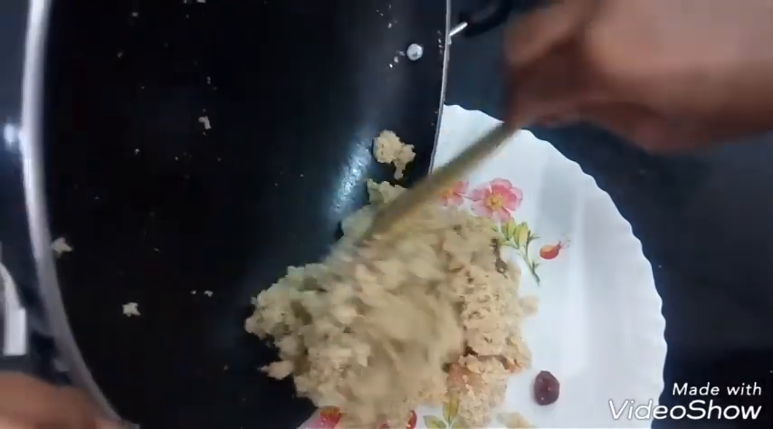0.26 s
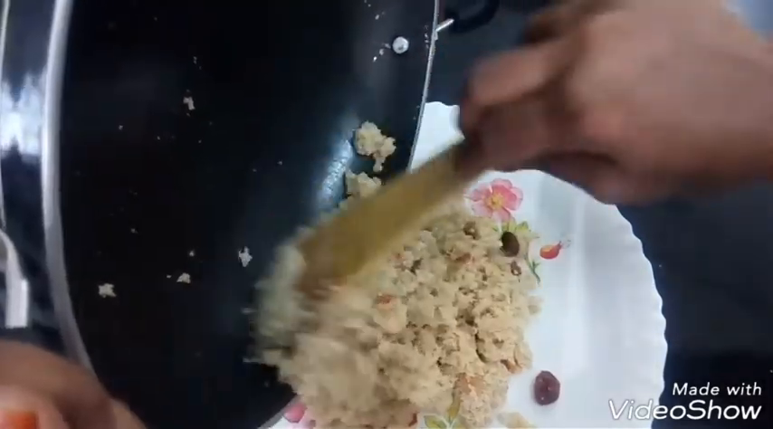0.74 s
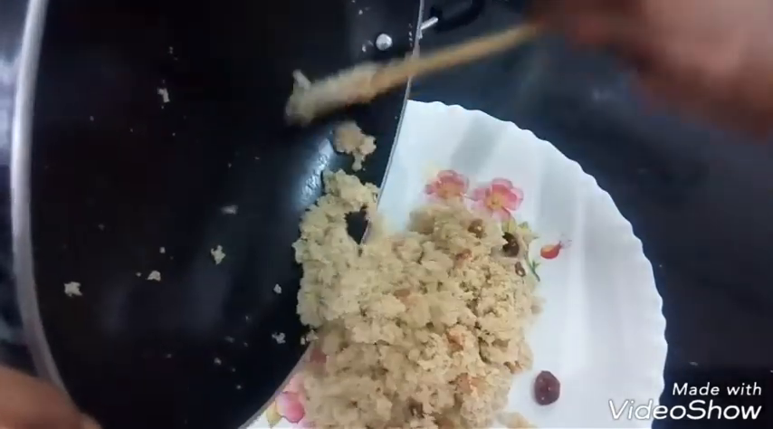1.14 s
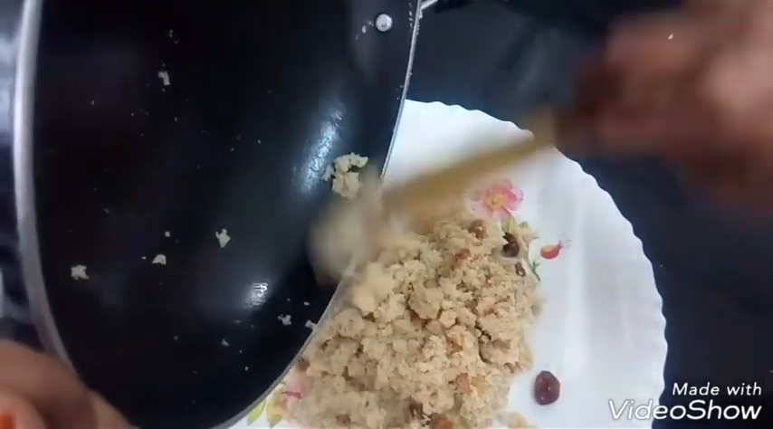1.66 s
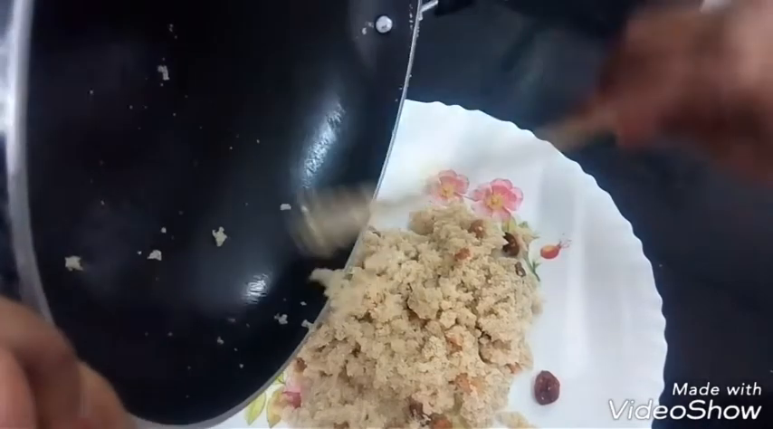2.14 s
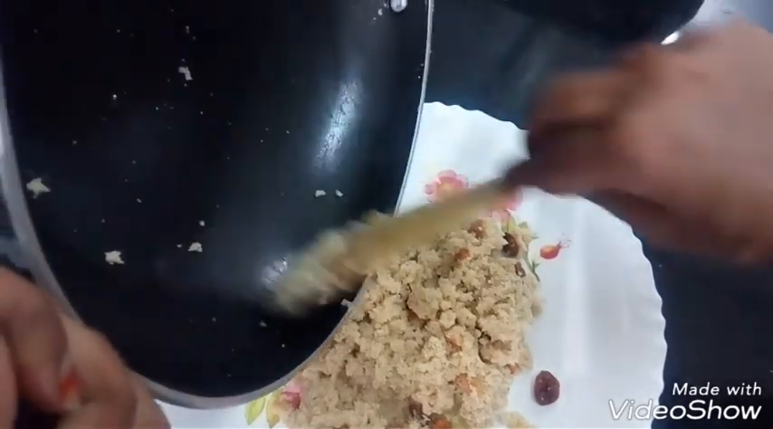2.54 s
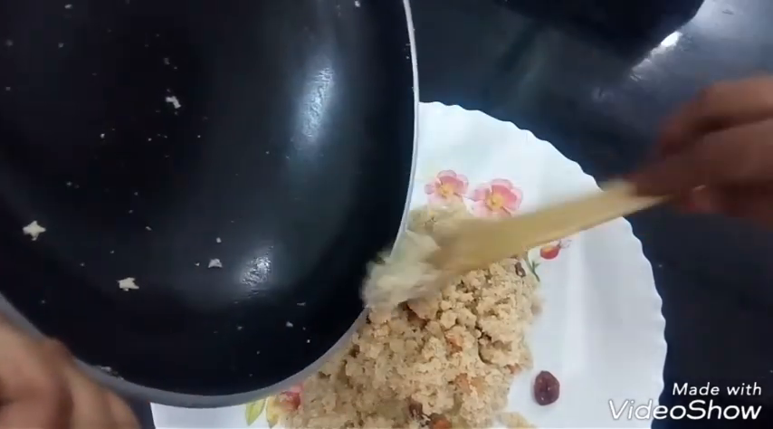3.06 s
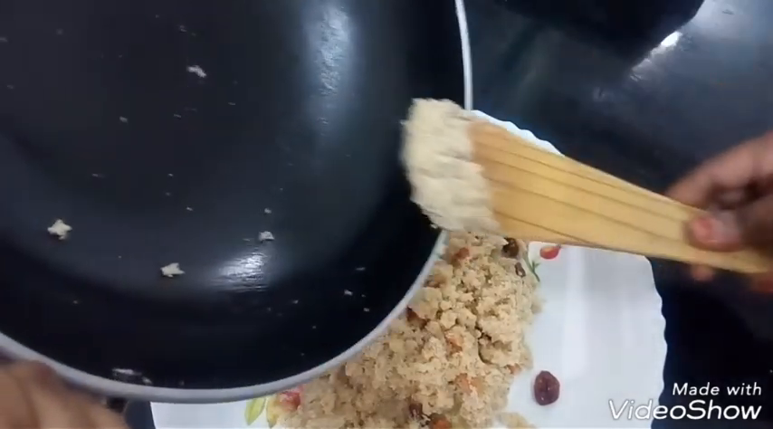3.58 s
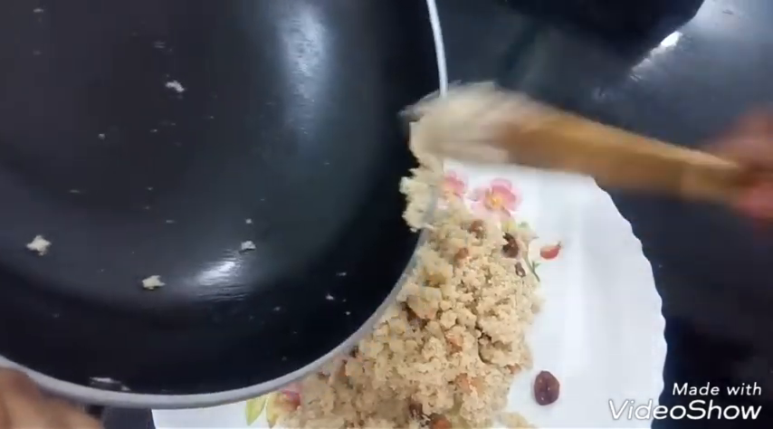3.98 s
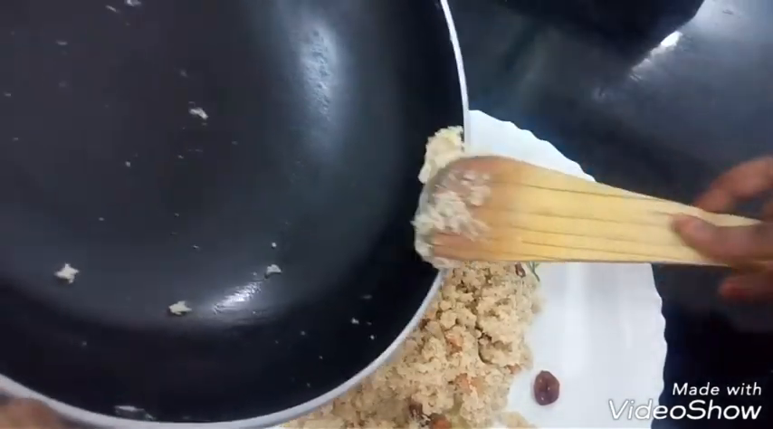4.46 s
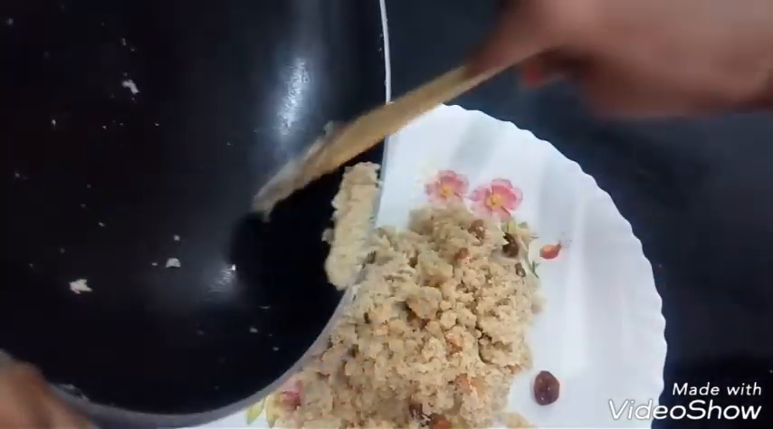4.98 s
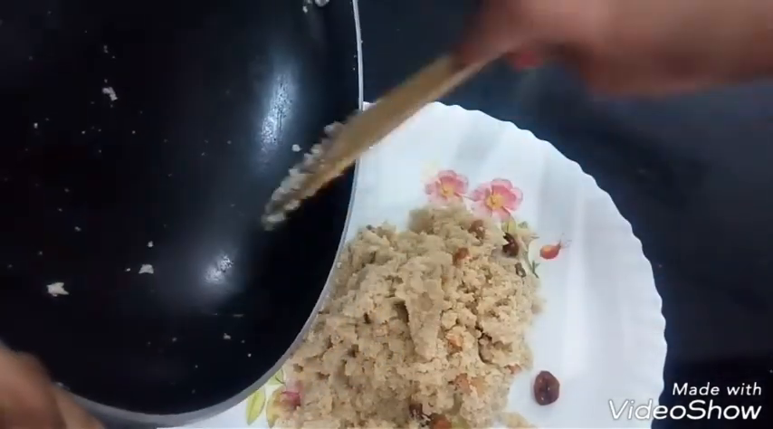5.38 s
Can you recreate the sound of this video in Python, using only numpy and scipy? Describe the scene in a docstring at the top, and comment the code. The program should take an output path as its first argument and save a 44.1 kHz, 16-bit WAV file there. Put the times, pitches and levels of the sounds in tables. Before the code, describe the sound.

Irregular scraping strokes of wood on a coated metal pan, starting with a squeaky bite and long rasp, then shorter sweeps with ticks and dull thuds. After three seconds there is a brief lull, a sharp knock on the pan rim, then quick wiping rubs and a final strong scrape. Heard close in stereo, in a lightly reflective kitchen with soft rumble and a faint motor-like hum.

```python
"""Small kitchen, close by: a wooden spatula pushes a moist, crumbly mixture out of a nonstick pan onto a plate.
Strokes are streams of random slips in four registers, rung through pan modes; some modes sing as bent sines.
Past halfway the spatula is knocked on the rim (contacts exciting damped modes) and wiped clean on it.
Clacks, taps and thuds are short damped tones. Behind: shaped-noise air and rumble, a thin whine, a gliding hum."""
import sys
import numpy as np
from scipy import signal
from scipy.fft import rfft, irfft
from scipy.io import wavfile
from scipy.ndimage import map_coordinates

SR = 44100
rng = np.random.default_rng(int(sys.argv[2]) if len(sys.argv) > 2 else 0)


def log_audio(samples):
    """Write samples as a 16-bit WAV file to the path given in sys.argv[1]."""
    # one column per channel
    frames = np.atleast_2d(samples).T
    # limit to full scale, then quantise
    limited = np.clip(frames, -1, 1)
    pcm = np.round(limited * 32767).astype(np.int16)
    wavfile.write(sys.argv[1], SR, pcm)


N = 247842
TIME = np.arange(N) / SR
FREQS = np.maximum(np.arange(N // 2 + 1) * SR / N, 1)


def scraping(smooth=0.8, crumbs=0.6, catch_db=1.5, drone_hz=650, hiss_hz=2400, fizz_hz=8000, alike_below_hz=600):
    """Tiny slips, breaking crumbs and smooth friction feed four registers that swell with each stroke."""
    # friction spectrum: [f/Hz, relative level/dB]
    friction_spectrum = [(110, -19), (210, -6), (330, 9), (480, 0.5), (750, -6), (1000, -5.5), (1400, -5.5),
                         (1800, 0), (2250, -7.5), (2800, -6.5), (4400, -8.5), (6800, -8.5), (8000, -18.5),
                         (11500, -22.5), (13500, -37.5), (15000, -51.5)]
    slips = grains(per_s=5500, spread_db=3.0) + crumbs * grains(per_s=300, spread_db=1.5)
    # spread along the blade: unlike at the two microphones
    rub = cut(rng.standard_normal((2, N)), alike_below_hz, "high")
    # blade catches and lets go
    catch = rms_one(cut(rng.standard_normal(N), 90.0, "low"))
    slips = (slips + smooth * rub) * from_db(catch_db * catch)

    above_drone = 1 / (1 + (drone_hz / FREQS) ** 6)
    above_rasp = 1 / (1 + (hiss_hz / FREQS) ** 6)
    above_fizz = 1 / (1 + (fizz_hz / FREQS) ** 24)
    registers = [1 - above_drone, above_drone - above_rasp, above_rasp * (1 - above_fizz), above_fizz]
    colour = gains(friction_spectrum)
    out = 0
    for level, register in zip(efforts(), registers):
        out = out + level * rms_one(shaped(slips, register * colour))
    return out


def efforts(attack_s=.004, ease_db_per_s=6, fizz_db=-64, firm_sweep_db=-48, fizz_growth=1.4,
            fizz_waver_db=2.6, fizz_waver_hz=22):
    """Drone, rasp, hiss and fizz amplitudes: bites grind on bare pan, sweeps move the mixture along."""
    # bites: [start t/s, length/s, drone level/dB, rasp re drone/dB, hiss re drone/dB]
    bite_table = [(0.056, 0.012, -67, 5, 4), (0.078, 0.12, -47, -4.5, -4), (0.835, 0.014, -51, -9, 1.5),
                  (1.33, 0.15, -57, 2.5, 2), (2.065, 0.034, -51.5, -3, -4), (2.53, 0.11, -47, -5, -7.5),
                  (3.53, 0.085, -50, 0, -3.5), (5.16, 0.024, -53, -2.5, -2)]
    # sweeps: [start t/s, rise/s, length/s, fade after rise/dB, hiss level/dB, rasp re hiss/dB, drone re hiss/dB]
    sweep_table = [(0.231, 0.14, 0.4, 19.5, -48.5, -7.5, -7), (0.871, 0.06, 0.16, 3, -49, -15, -21.5),
                   (1.056, 0.031, 0.24, 13, -75, 8, -5), (1.295, 0.02, 0.03, 2, -66, -1, -18),
                   (1.435, 0.13, 0.17, 5.5, -48.5, -4.5, -10), (1.615, 0.046, 0.13, 0.5, -54.5, -7, -4.5),
                   (2.095, 0.049, 0.029, 13, -43.5, -6.5, -38), (2.112, 0.1, 0.12, -1.5, -48.5, -11, -13),
                   (2.603, 0.072, 0.26, 12.5, -48.5, -4.5, -3.5), (3.08, 0.067, 0.16, 4.5, -48.5, -8, -25),
                   (3.611, 0.14, 0.14, 2.5, -48, -10, -5), (3.751, 0.018, 0.13, -13, -64, -11.5, -6.5),
                   (3.901, 0.024, 0.037, 9.5, -49.5, -20, -14),
                   (3.933, 0.05, 0.054, 4.5, -44.5, -10.5, -4.5), (4.077, 0.058, 0.074, 1, -68.5, -13, -5),
                   (4.176, 0.024, 0.086, 0.5, -67.5, -20, 4), (4.315, 0.12, 0.155, 9, -45.5, -7, -4.5),
                   (4.446, 0.015, 0.45, 21.5, -55.5, -14.5, 2), (4.692, 0.043, 0.084, 6, -59.5, -22, -16),
                   (4.728, 0.052, .056, 0, -48.5, -12, -11), (5.201, 0.055, 0.034, 10, -38.5, -6.5, -12.5),
                   (5.247, 0.028, 0.11, 0.5, -49, -9.5, -8)]
    drone, rasp, hiss = np.zeros((3, N))
    for s, length_s, db, rasp_db, hiss_db in bite_table:
        bite = from_db(db) * stroke(s, attack_s, length_s, 0)
        drone += bite
        rasp += from_db(rasp_db) * bite
        hiss += from_db(hiss_db) * bite
    for s, rise_s, length_s, fade_db, db, rasp_db, drone_db in sweep_table:
        sweep = from_db(db) * stroke(s, rise_s, length_s, fade_db)
        # wrist eases: drone dies before hiss
        eased_db = ease_db_per_s * np.clip(TIME - s - rise_s, 0, length_s)
        drone += from_db(drone_db - eased_db) * sweep
        rasp += from_db(rasp_db) * sweep
        hiss += sweep
    # fizz outgrows hiss; its level wavers at random
    speed = hiss / from_db(firm_sweep_db)
    fizz = from_db(fizz_db + fizz_waver_db * drift(fizz_waver_hz)) * speed ** fizz_growth
    return drone, rasp, hiss, fizz


def stroke(s, rise_s, length_s, fade_db, release_db_per_s=288):
    """Stroke envelope: the blade gathers speed, changes level along its path, then lifts."""
    t = np.maximum(TIME - s, 0)
    attack = np.sin(np.pi / 2 * np.minimum(t / rise_s, 1))
    along = np.clip((t - rise_s) / max(length_s - rise_s, .005), 0, 1)
    lifted_s = np.clip(t - length_s, 0, 1)
    return attack * from_db(-fade_db * along - release_db_per_s * lifted_s)


def wall_echo(x, share, path_s, travel, rate_hz):
    """A pan wall answers after a randomly wandering delay, so comb colouring keeps shifting."""
    r = np.exp(-2 * np.pi * rate_hz / SR)
    # first half dropped: filter settling
    place = rms_one(signal.lfilter([1], [1, -2 * r, r * r], rng.standard_normal(2 * N))[N:])
    delay_s = path_s * np.exp(travel * place)
    echo = np.array([np.interp(TIME - delay_s, TIME, side) for side in x])
    return (x + share * echo) / np.sqrt(1 + share ** 2)


def pan(x, ring_db, shift_db=0, nodes_hz=12):
    """Direct contact plus pan modes; a moving blade crosses their still lines, feeding each by turns."""
    # pan modes: [f/Hz, width/Hz, relative lift/dB]
    pan_modes = [(414, 18, -2), (581, 8, -6), (628, 20, -2), (893, 35, -6), (1262, 30, -7), (1809, 12, 0),
                 (1981, 4.5, 9), (2293, 10, -2), (2735, 25, -2), (2850, 20, -2), (3345, 10, -3),
                 (4240, 40, -3), (4449, 14, 2), (4716, 25, 1), (5170, 45, 0), (5486, 13, 6), (5669, 16, 0),
                 (6235, 8, 6), (6550, 14, 1), (6830, 22, 2), (7740, 35, 1)]
    out = x
    for hz, width_hz, db in pan_modes:
        feed_db = ring_db + db + shift_db * np.tanh(drift(nodes_hz))
        out = out + resonance(x * from_db(feed_db), hz, width_hz)
    return out


def hollow(width_hz=120):
    """The gap under the blade rings like a cavity; its pitch falls as the gap opens."""
    # light stroke: [start t/s, length/s, start f/Hz, end f/Hz, level/dB]
    gap_stroke = (3.11, .15, 900, 430, -61)
    s, length_s, from_hz, to_hz, db = gap_stroke
    hz = from_hz * (to_hz / from_hz) ** np.clip((TIME - s) / length_s, 0, 1)
    noise = rms_one(cut(rng.standard_normal(N), width_hz, "low"))
    carrier = np.sin(2 * np.pi * np.cumsum(hz) / SR)
    return from_db(db) * stroke(s, length_s / 2, length_s, 0) * noise * carrier


def squeaks(flutter=0.3, waver=.002, rate_hz=130, ring_on_db=-9):
    """Stick-slip locks on to a mode: a tone of unsteady strength and pitch that rings on steadily."""
    # squeaks: [peak t/s, swell half-length/s, f/Hz, level/dB, ring t60/s]
    squeak_table = [(0.03, 0.055, 1812, -62, .3), (0.01, .04, 2842, -66, .2), (0.064, .009, 2842, -55, .2),
                    (0.1, 0.026, 2842, -46, .2), (0.118, 0.036, 4452, -38, .18),
                    (0.158, .016, 4480, -45, .15), (0.15, .04, 1810, -52, .2),
                    (0.208, 0.026, 1810, -44, .2), (1.313, .012, 4450, -56, .2),
                    (1.345, .008, 4300, -44, .1), (1.77, .06, 1982, -64, .6), (2.11, 0.02, 4450, -46, .2),
                    (2.255, 0.055, 1982, -55, .65), (2.608, 0.06, 354.5, -45, .3),
                    (2.64, .035, 5486, -49, .3), (2.661, 0.02, 1830, -39, .2), (2.85, 0.08, 1982, -64, .55),
                    (3.16, 0.03, 6570, -48, .2), (3.235, .022, 6570, -46, .2), (3.265, 0.07, 1981, -58, .6),
                    (4.2, .016, 5600, -55, .2), (4.205, .016, 7100, -62, .15), (4.42, .04, 1982, -54, .4),
                    (5.173, 0.012, 1810, -47, .2), (5.47, .05, 2780, -72, .2), (5.56, .08, 3340, -69, .4)]
    out = np.zeros(N)
    bend, rough = rms_one(cut(rng.standard_normal((2, N)), rate_hz, "low"))
    for s, length_s, hz, db, t60_s in squeak_table:
        driven = swell(s, length_s)
        tail = (TIME > s) * from_db(ring_on_db - 60 * np.clip((TIME - s) / t60_s, 0, 2))
        strength = np.maximum(driven * (1 + flutter * rough), tail)
        clock_s = np.cumsum(1 + waver * bend * driven) / SR
        out += from_db(db) * strength * np.sin(2 * np.pi * hz * clock_s)
    return out


def knock(level_db=-1.5, crack_db=-23.5, crack_t60_s=0.15, low_hz=105, top_hz=7300):
    """Flat wood meets the rim in a quick run of contacts; each excites a crack and damped modes."""
    # contacts: [t/s, relative level/dB, contact softness (lowpass) f/Hz]
    contacts = [(3.5237, -3, 2500), (3.5282, -27, 5400), (3.5262, -1.5, 11000), (3.5319, -17.5, 1900),
                (3.5456, -11, 3300)]
    # struck blade and rim: [f/Hz, relative level/dB, t60/s]
    rim_modes = [(324, -40, 0.08), (407, -29, 0.036), (640, -33, .1), (633, -18.5, 0.0028),
                 (1340, -31.5, 0.019), (1970, -10.5, 0.011), (1981, -28, 0.12), (2220, -13, 0.011),
                 (2310, -34.5, .11), (2730, -47.5, .18), (3300, -22, 0.013), (4610, -15.5, 0.01),
                 (5510, -28.5, 0.025), (6370, -26, 0.0023), (6830, -34, .08)]
    force = np.zeros(N)
    for s, db, soft_hz in contacts:
        add(force, s, from_db(db) * cut(signal.unit_impulse(256), soft_hz, "low", order=1))
    t, fade = dying(crack_t60_s, .2)
    body = from_db(crack_db) * fade * cut(rng.standard_normal(len(t)), [250, 6500], "band")
    for hz, db, t60_s in rim_modes:
        body += from_db(db) * dying(t60_s, .2)[1] * np.cos(2 * np.pi * hz * t)
    blow = cut(signal.fftconvolve(force, body)[:N], low_hz, "high")
    return from_db(level_db) * cut(blow, top_hz, "low", order=8)


def clacks(crack_db=-5, crack_t60_s=.015, top_hz=4800):
    """Bare, hard contact of wood on pan: a dense crack plus a few short wood modes."""
    # clacks: [t/s, level/dB, pitch f/Hz]
    clack_table = [(1.2445, -37.5, 1304), (1.415, -39.5, 1610), (1.435, -21.5, 2020)]
    # modes: [multiple of pitch, relative level/dB, t60/s]
    wood_modes = [(.72, -7, .012), (1, -2, .011), (1.3, -4, .011), (1.9, -11, .008)]
    out = np.zeros(N)
    for s, level_db, hz in clack_table:
        t, fade = dying(crack_t60_s, .05)
        burst = rms_one(cut(rng.standard_normal(len(t)), [hz / 2, hz * 2], "band"))
        clack = from_db(crack_db) * fade * burst
        for multiple, db, t60_s in wood_modes:
            clack += from_db(db) * dying(t60_s, .05)[1] * np.cos(2 * np.pi * hz * multiple * t)
        add(out, s, from_db(level_db) * cut(clack, hz * .64, "high", order=4))
    return cut(out, top_hz, "low", order=4)


def taps(note=0.43, grit=0.6, top_hz=7000):
    """Light blade ticks on pan and plate: a heavily damped note with a burst of grit around it."""
    # taps: [t/s, level/dB, pitch f/Hz, t60/s]
    tap_table = [(0.0812, -38, 2850, 0.009), (0.0895, -33, 4330, 0.0061), (.8435, -34, 4250, 0.013),
                 (1.3315, -32, 2600, .02), (1.3409, -37, 4200, 0.045), (1.399, -24, 3350, 0.008),
                 (3.747, -36, 5600, 0.0065), (3.8638, -27.5, 4600, 0.017), (3.9135, -37, 5500, .008),
                 (4.327, -41, 4100, .012), (4.452, -32, 4500, 0.0081), (5.356, -32, 5700, 0.0069),
                 (4.3575, -29.5, 5000, 0.016), (4.3829, -27.5, 4400, 0.014)]
    out = np.zeros(N)
    for s, db, hz, t60_s in tap_table:
        t, fade = dying(t60_s, 0.015)
        band_hz = [hz * .5, hz * 2]
        burst = rms_one(cut(rng.standard_normal(len(t)), band_hz, "band", order=1))
        tap = fade * (note * np.sin(2 * np.pi * hz * t) + grit * burst)
        add(out, s, from_db(db) * cut(tap, band_hz, "band"))
    return cut(out, top_hz, "low", order=4)


def thuds(t60_s=0.089, rise_s=0.003):
    """Blade landing through the mixture, or a dropped lump: a cushioned blow moves low, damped modes."""
    # thuds: [t/s, level/dB, pitch f/Hz]
    thud_table = [(0.844, -42.5, 345), (1.496, -41.5, 329), (2.533, -68, 353), (3.253, -55, 430),
                  (3.69, -37, 458), (4.762, -42, 418), (5.165, -40, 359.5), (5.355, -39.5, 364)]
    # modes: [multiple of pitch, relative level/dB]
    thud_modes = [(.86, -9), (0.999, 0.5), (1.181, -4.5)]
    out = np.zeros(N)
    t, fade = dying(t60_s, .2)
    for s, db, hz in thud_table:
        ring = sum(from_db(mode_db) * np.sin(2 * np.pi * hz * multiple * t) for multiple, mode_db in thud_modes)
        add(out, s, from_db(db) * fade * (1 - np.exp(-t / rise_s)) * ring)
    return out


def kitchen(x, room_db, room_t60_s, counter_db, bounce, counter_t60_s=0.031, room_top_hz=7000):
    """Two microphones hear the source by paths of their own, then counter and room reflections."""
    # short paths over the pan, a row per microphone, left then right: [delay 1/s, delay 2/s]
    path_delays = [(0.000155, 0.0002996), (0.0000946, 0.0002218)]
    # left minus right: [f/Hz, level difference/dB]
    stereo_lean = [(100, 1.5), (380, 4.5), (690, 3.5), (1270, -0.5), (2340, -5.5), (4320, -2), (8000, -5),
                   (14000, -7)]
    x = np.broadcast_to(x, (2, N))
    t, room_fade = dying(room_t60_s, .5)
    counter, room = cut(rng.standard_normal((2, 2, len(t))), [300, 8500], "band", order=1)
    counter = counter * dying(counter_t60_s, .5)[1] * (t > .001)
    # finest treble dies in the walls
    room = cut(room, room_top_hz, "low", order=6) * room_fade * (t > .005)
    # unit-energy tails: levels are re direct sound
    echoes = from_db(counter_db) * rms_one(counter) + from_db(room_db) * rms_one(room)
    echoes = echoes / np.sqrt(len(t))
    direct = np.array([scatter(side, delays_s, bounce) for side, delays_s in zip(x, path_delays)])
    heard = direct + signal.fftconvolve(x, echoes, axes=1)[:, :N]
    return shaped(heard, gains(stereo_lean) ** np.array([[.5], [-.5]]))


def scatter(x, delays_s, bounce):
    """Short repeated reflections as allpasses: they scramble phase and leave colour alone."""
    turns = [np.exp(-2j * np.pi * FREQS * s) for s in delays_s]
    return shaped(x, np.prod([(bounce + z) / (1 + bounce * z) for z in turns], axis=0))


def rumble(swell_width=0.16):
    """Dull low noise of varying level, with low, hollow swells from doubly resonated noise."""
    # level: [t/s, level/dB]
    rumble_level = [(0, -64.5), (.9, -71), (3.4, -70.5), (4.1, -61), (4.55, -62.5), (4.85, -66.5),
                    (5.62, -58)]
    # colour: [f/Hz, relative level/dB]
    rumble_colour = [(35, -21), (80, 0), (112, 3.5), (160, 3), (250, 0), (400, -0.5), (600, -17),
                     (1200, -52.5)]
    # hollow swells: [peak t/s, half-length/s, f/Hz, level/dB]
    swell_table = [(4.182, 0.34, 656, -65), (4.26, 0.084, 525, -61)]
    level_db = np.interp(TIME, *np.transpose(rumble_level))
    out = from_db(level_db) * rms_one(shaped(wide_noise(), gains(rumble_colour)))
    for s, length_s, hz, db in swell_table:
        width_hz = hz * swell_width
        tone = resonance(resonance(rng.standard_normal(N), hz, width_hz), hz, width_hz)
        out += from_db(db) * swell(s, length_s) * rms_one(tone)
    return out


def air(level_db=-69.5):
    """Room air: steady, wide shaped noise."""
    # colour: [f/Hz, relative level/dB]
    air_colour = [(15, -33), (25, -17), (125, 5), (237, -18), (604, -9), (1500, -16.5), (2020, -16),
                  (3010, -18.5), (4200, -15.5), (5140, -14), (6800, -24), (8780, -36), (9770, -28.5),
                  (15000, -66)]
    return from_db(level_db) * rms_one(shaped(wide_noise(), gains(air_colour)))


def whine(waver_db=3):
    """Faint thin whine: sines with wandering level and phase."""
    # partials: [f/Hz, level/dB]
    whine_partials = [(4764, -81), (9528, -90.5)]
    out = np.zeros(N)
    for hz, db in whine_partials:
        tone = rms_one(np.sin(2 * np.pi * hz * TIME + drift(9.2)))
        out += from_db(db + waver_db * drift(8)) * tone
    return out


def hum(waver=0.012, flicker_db=4.0):
    """Faint, far motor-like hum: low harmonics glide together, each fading in and out on its own."""
    # course: [t/s, pitch f/Hz, level/dB]
    hum_course = [(0, 139.1, -74), (.17, 147.4, -60.5), (.36, 154.1, -59), (0.539, 138.5, -68),
                  (.8, 123.8, -84), (3.7, 135.8, -80.5), (3.98, 127.3, -64), (4.12, 121.1, -74),
                  (4.3, 123, -70), (4.65, 118.6, -74), (5.0, 109.4, -68), (5.251, 108.1, -62.5),
                  (5.62, 113.5, -71.5)]
    # harmonics: [multiple, relative level/dB]
    hum_harmonics = [(1, 0), (2, -2), (3, -10.5), (4, -14)]
    s, hz, level_db = np.transpose(hum_course)
    pitch_hz = np.interp(TIME, s, hz) * (1 + waver * drift(20))
    phase = 2 * np.pi * np.cumsum(pitch_hz) / SR
    tone = np.zeros(N)
    for multiple, db in hum_harmonics:
        tone += from_db(db + flicker_db * drift(11)) * np.sin(multiple * phase)
    return from_db(np.interp(TIME, s, level_db)) * tone


def from_db(db):
    """Decibels to gain."""
    return 10 ** (np.asarray(db) / 20)


def rms_one(x):
    """Scale to unit rms."""
    return x / np.sqrt(np.mean(x ** 2) + 1e-20)


def gains(points):
    """[f/Hz, level/dB] table to a gain per FFT bin, interpolated over log frequency."""
    hz, db = np.transpose(points)
    return from_db(np.interp(np.log(FREQS), np.log(hz), db))


def shaped(x, gain):
    """Filter by a gain per FFT bin."""
    return irfft(rfft(x) * gain, N)


def awake(x):
    """An inaudible trickle keeps a filter from running dry."""
    return x + 1e-15 * np.sin(np.arange(np.shape(x)[-1]))


def cut(x, hz, kind, order=2):
    """Causal Butterworth filter."""
    sos = signal.butter(order, np.minimum(hz, .45 * SR), kind, fs=SR, output="sos")
    return signal.sosfilt(sos, awake(x))


def resonance(x, hz, width_hz):
    """Two-pole resonance, peak gain 1."""
    r = np.exp(-np.pi * width_hz / SR)
    zeros = np.array([1, 0, -1]) * (1 - r * r) / 2
    poles = [1, -2 * r * np.cos(2 * np.pi * hz / SR), r * r]
    return signal.lfilter(zeros, poles, awake(x))


def dying(t60_s, length_s):
    """Times and an envelope that falls 60 dB in t60_s."""
    t = TIME[:int(length_s * SR)]
    return t, np.exp(-np.log(1000) * t / t60_s)


def swell(s, length_s):
    """Gaussian rise and fall around s, down to exp(-2) at length_s either side."""
    return np.exp(-2 * np.minimum(((TIME - s) / length_s) ** 2, 20))


def add(out, s, sound):
    """Mix a short sound in at time s."""
    part = out[int(s * SR):][:len(sound)]
    part += sound[:len(part)]


def grains(per_s, spread_db):
    """Random clicks, mostly small and a few large; rms 1."""
    sizes = from_db(spread_db * np.minimum(rng.exponential(1, N), 4)) * rng.choice([-1, 1], N)
    return rms_one(sizes * (rng.random(N) < per_s / SR))


def drift(rate_hz):
    """Smooth random wander, rms 1, by cubic interpolation of random knots."""
    knots = rng.standard_normal(int(N / SR * rate_hz) + 4)
    coarse_s = TIME[::100]
    return rms_one(np.interp(TIME, coarse_s, map_coordinates(knots, [coarse_s * rate_hz + 1], order=3)))


def wide_noise(width=0.9):
    """Stereo white noise: a shared part plus a part of opposite sign on each side."""
    middle, side = rng.standard_normal((2, 1, N))
    return middle + width * side * [[1], [-1]]


def scene():
    """Strokes, squeaks, knock and ticks sound into the kitchen; knock and ticks lean to the right."""
    counter_db = -11
    far_wall = wall_echo(scraping(), share=0.53, path_s=0.001602, travel=0.2237, rate_hz=2.46)
    rubbing = wall_echo(far_wall, share=0.21, path_s=0.000697, travel=.35, rate_hz=3.5)  # near wall
    on_pan = pan(rubbing, ring_db=-1.5, shift_db=6.5) + hollow() + thuds()
    strokes = kitchen(on_pan, room_db=-17.5, room_t60_s=0.44, counter_db=counter_db, bounce=0.67)
    singing = kitchen(squeaks(), room_db=-23, room_t60_s=0.32, counter_db=-21.5, bounce=0.81)
    rim_blows = pan(knock(), ring_db=-2.5)
    blows = kitchen(rim_blows, room_db=-22.5, room_t60_s=0.45, counter_db=counter_db, bounce=0.56)
    ticks = kitchen(taps() + clacks(), room_db=-14, room_t60_s=0.32, counter_db=counter_db, bounce=0.72)
    lean_right = from_db([[-1.0], [1.0]])
    return strokes + singing + (blows + ticks) * lean_right + rumble() + air() + whine() + hum()


def record(dry):
    """Steep elliptic lowpass at 15 kHz."""
    return signal.sosfilt(signal.ellip(10, .1, 70, 15000, fs=SR, output="sos"), dry)


dry = scene()
out = record(dry)
log_audio(out)
```